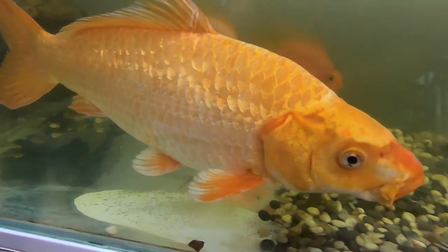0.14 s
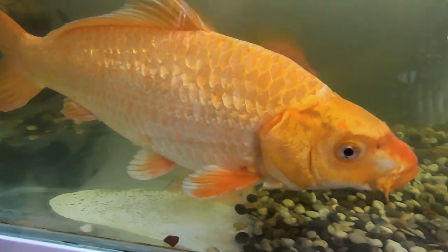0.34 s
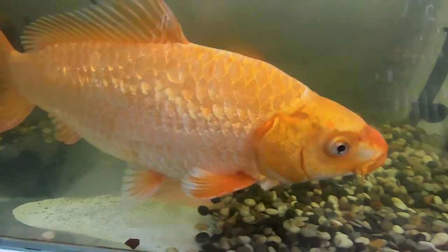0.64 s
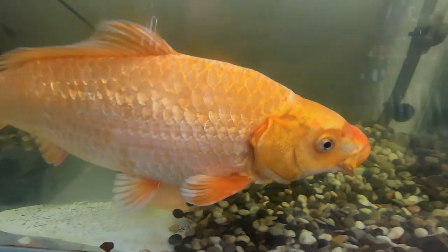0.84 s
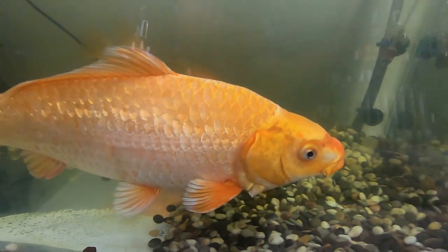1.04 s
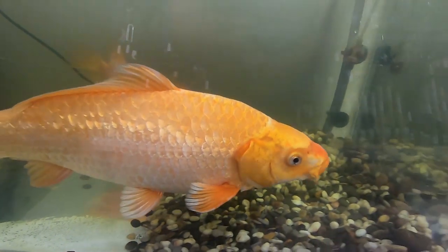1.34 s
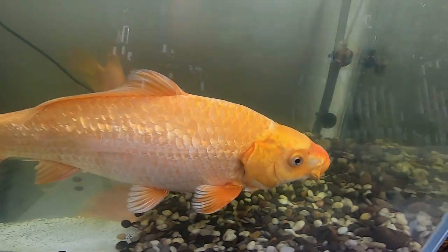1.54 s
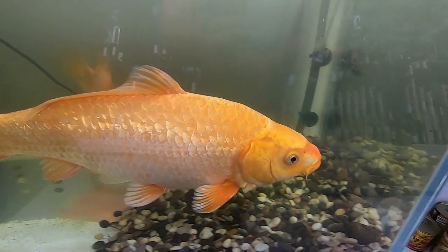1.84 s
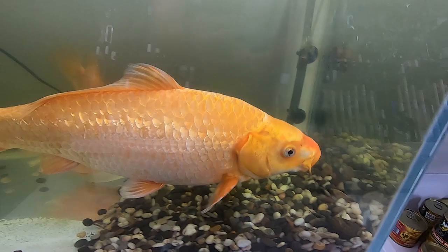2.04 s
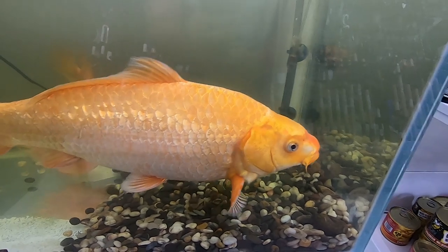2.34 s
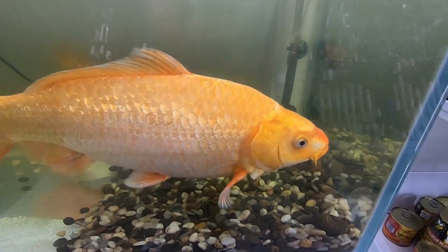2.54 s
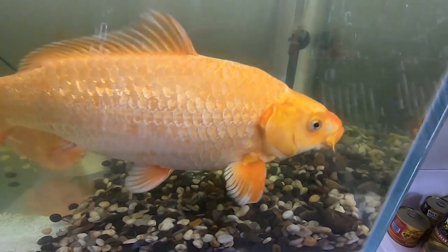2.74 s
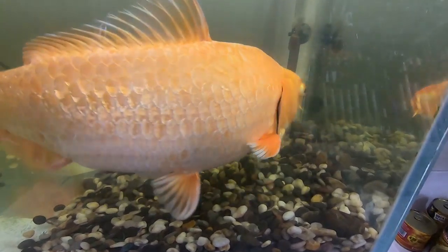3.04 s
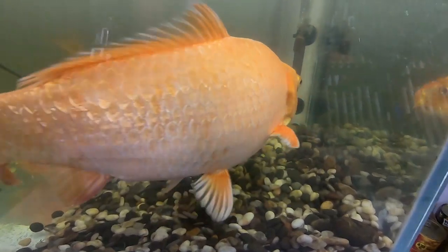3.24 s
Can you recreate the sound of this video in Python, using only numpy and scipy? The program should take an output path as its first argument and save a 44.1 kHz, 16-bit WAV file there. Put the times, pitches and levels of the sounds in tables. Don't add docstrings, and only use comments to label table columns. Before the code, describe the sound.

Aquarium air pump hums low and steady while water bubbles and air hisses faintly

```python
import sys
import numpy as np
from scipy import signal
from scipy.fft import rfft, irfft
from scipy.io import wavfile
from scipy.ndimage import uniform_filter1d

SR = 44100
rng = np.random.default_rng(int(sys.argv[2]) if len(sys.argv) > 2 else 0)


def magnitude_from_level(level_db):
    exponent = np.asarray(level_db, float) / 20
    return 10 ** exponent


def inscribe(sig):
    pcm = np.round(np.clip(np.atleast_2d(sig).T, -1, 1) * 32767)
    wavfile.write(sys.argv[1], SR, pcm.astype(np.int16))


N = 149940
STROKE_HZ = 50.03

# multiple of the stroke rate, level in dB, wobble in dB.
HARMONICS = [(2, -34, 0.33), (3, -49.5, 1), (4, -57.5, -1.5), (5, -60.5, 4.5)]
# time in seconds, change of hum in dB.
PUMP_LOAD = [(0, -2.2), (.8, -1), (1.7, -1.2), (2.6, -0.05), (3.4, 0)]
# frequency in Hz, density in dB per Hz.
RUMBLE_SPECTRUM = [(30, -52), (50, -27), (72, -6.5), (120, -6), (190, -3), (280, -11), (550, -18.5),
                   (1100, -22)]
# time in seconds, level in dB.
RUMBLE_LEVEL = [(0, -34), (.3, -41), (.7, -39.5), (.9, -38), (1.3, -42.5), (1.75, -45), (2.3, -46.5),
                (2.8, -45), (3.4, -45)]
# frequency in Hz, width in Hz, level in dB.
CASE_MODES = [(127, 3.4, -52.5), (150, 11, -60), (197.7, 40, -55.5), (298, 4.8, -62.5), (351.3, 8.6, -66),
              (368.6, 7.9, -66), (449, 18, -78), (644, 60, -67)]
# centre in seconds, frequency in Hz, level in dB, span in seconds.
CASE_THROBS = [(.03, 150, -39, .03), (.08, 183, -47, 0.055), (.14, 205, -40.5, 0.037),
               (.2, 152, -38, 0.077), (.31, 300, -53, 0.034), (.35, 144, -40, 0.026),
               (.43, 200, -39, 0.059), (.5, 146, -42, 0.032), (.57, 193, -44, 0.038),
               (.63, 140, -40, 0.046), (.7, 201, -39, 0.012), (.98, 148, -61, 0.036), (1.2, 151, -49, .04),
               (1.26, 190, -45, 0.05), (1.38, 152, -43.5, 0.053), (1.65, 151, -40, 0.062),
               (1.71, 194, -40, 0.015), (1.95, 150, -40, 0.059), (2.11, 258, -45, 0.033),
               (2.12, 152, -40, 0.053), (2.58, 203, -47, .03), (2.6, 149, -40.5, 0.022),
               (3.14, 190, -47.5, 0.036), (3.27, 199, -43.5, 0.025)]
# frequency in Hz, density in dB per Hz.
WASH_SPECTRUM = [(600, -4), (960, -4), (1250, 1.5), (2500, -1.5), (3200, -14), (4200, -14), (5200, -20.5),
                 (7500, -28.5)]
# time in seconds, level in dB, extra level of low bubbles in dB.
BUBBLING = [(0.0, -49.5, -4), (0.07, -46.5, 6.5), (0.98, -48.5, 10), (1.29, -44, -5), (1.36, -47, -11),
            (1.92, -47, -13), (1.95, -44.5, -32), (1.99, -47.5, -6), (2.51, -48, 1), (3.29, -45.5, 6.5),
            (3.4, -49, 11.5)]
# frequency in Hz, width in Hz, level in dB, busiest moment and span in seconds.
TANK_MODES = [(1278, 150, -6, 3.14, 0.15), (1465, 41, -10.5, 2.55, 0.52), (2120, 230, -10, 1.96, 0.034),
              (2650, 96, -2, 2.32, 0.017), (1850, 20, -22, 0.76, 0.48), (2112, 16, -14, 1.23, 0.63),
              (2420, 41, -22, 0.68, 1), (2260, 48, -10, 3.28, 0.33), (2385, 30, -9.5, .55, .1),
              (2404, 25, -10.5, 1.105, 0.068), (1550, 25, -11, 2.09, 0.12), (2520, 50, -15, 2.67, .1),
              (2350, 25, -13, 1.67, 0.089)]
# frequency in Hz, density in dB per Hz.
HISS_SPECTRUM = [(4500, -30), (7100, -6), (8900, 0), (9800, -6.5), (10750, -18), (11200, -36), (13400, -33),
                 (15000, -50)]
# time in seconds, level in dB.
HISS_LEVEL = [(0.0, -59), (1.92, -58), (2.52, -59.5), (2.65, -58), (3.2, -58), (3.4, -59.5)]
# time in seconds, depth of modulation from 0 to 1.
PUFF_DEPTH = [(0, .15), (.4, .27), (1.4, .22), (1.8, .12), (2.2, .2), (2.7, .1), (3.1, .25)]
# frequency in Hz, width in Hz, level in dB, busiest moment and span in seconds.
VALVE_WHISTLES = [(6800, 51, -20, 0.53, 0.7), (7990, 160, -8.5, 0.072, 0.79), (8450, 40, -25, 0.22, 0.27),
                  (8550, 50, -23, 1.1, .3), (9000, 95, -9.5, 0.54, 0.12), (8700, 57, -14, 0.96, .6),
                  (8100, 40, -10, 2.8, 0.2), (9050, 14, -18, 0.5, 0.11), (9600, 20, -18, 1.45, .03)]
# start in seconds, peak in dB, pitch in Hz.
LARGE_BUBBLES = [(0.047, -24, 1260), (0.176, -28, 1287), (.725, -38, 1850), (0.882, -35, 1176),
                 (0.93, -30, 1240), (1.06, -30, 1710), (1.396, -37, 1350), (1.492, -31, 2060),
                 (1.705, -31, 1680), (2.205, -29, 1550), (2.299, -35, 2540), (2.439, -42, 1540),
                 (2.479, -33, 1445), (2.644, -30, 1440), (2.682, -28.5, 1410), (2.721, -33, 1526),
                 (2.936, -30, 1360), (2.965, -31, 1214), (3.134, -27, 1300), (3.311, -30, 2156),
                 (0.809, -26.5, 2060), (1.144, -25, 1530), (1.201, -24.5, 2110), (1.602, -32.5, 2150),
                 (1.944, -26, 2130), (2.529, -28.5, 1398), (2.879, -33, 1750), (3.022, -24.5, 1233),
                 (3.082, -24, 1247), (3.232, -33, 1330), (3.268, -26, 1590), (3.361, -27, 2120)]
PARTIAL_RATIOS = np.array([[1], [.88], [1.14]])
PARTIAL_SHARES = np.array([[1.3], [.55], [.65]])
# time in seconds, pitch in Hz, level in dB.
LEAK_SQUEAKS = [
    [(.22, 10800, -83), (.3, 10200, -76), (.42, 9600, -75)],
    [(2.56, 9500, -72), (2.63, 9950, -72), (2.67, 10400, -71), (2.715, 10650, -75), (2.74, 11500, -78),
     (2.785, 12900, -79)],
    [(2.735, 9300, -67), (2.77, 9900, -65), (2.805, 9450, -67), (2.85, 9600, -72)],
    [(2.92, 9500, -71), (2.955, 10350, -73), (3.005, 9950, -73), (3.04, 10500, -74), (3.13, 10650, -77)],
    [(2.93, 12200, -86), (3.0, 12450, -81), (3.05, 12850, -82), (3.09, 12900, -83), (3.14, 13250, -83),
     (3.19, 12300, -81), (3.24, 12000, -83), (3.27, 11400, -82), (3.36, 9500, -74)],
    [(2.57, 12900, -89), (2.64, 13250, -88), (2.69, 13600, -85)],
    [(.22, 13200, -86), (.3, 13900, -87)],
    [(3.18, 10000, -76), (3.21, 9450, -67), (3.27, 9600, -68), (3.3, 9300, -72)],
]
# frequency in Hz, coherence from 0 to 1.
COHERENCE = [(40, .62), (100, .9), (170, .84), (300, .82), (600, .3), (1130, .28), (2360, .57), (4920, .55),
             (10200, .25)]
# frequency in Hz, phase in radians.
LEFT_LEAD = [(20, .12), (600, 0.), (1380, -.3), (4050, .1), (6800, -.6), (7300, -1.4), (8600, -3.9),
             (10400, -7.2)]
# frequency in Hz, level difference in dB.
LEFT_OVER_RIGHT = [(60, -1), (170, -1), (470, 0.3), (1310, .7), (3670, -1.6), (10200, -2.5)]


def evened(x):
    return x / np.sqrt(np.mean(x ** 2) + 1e-20)


def read(points, hz):
    f, value = np.transpose(points)
    return np.interp(np.log(hz + 1), np.log(f + 1), value)


def curve(rows, column=1):
    rows = np.array(rows)
    return np.interp(np.arange(N) / SR, rows[:, 0], rows[:, column])


def drift(rate_hz):
    t = np.arange(0, N, 64) / SR
    f = np.geomspace(.1 * rate_hz, rate_hz, num=16)
    phase = rng.random(16)
    slow = (np.sin(2 * np.pi * (f * t[:, None] + phase)) / np.sqrt(f)).sum(1)
    return np.interp(np.arange(N) / SR, t, evened(slow))


def colour(x, points):
    hz = np.fft.rfftfreq(N, 1 / SR)
    inside = (hz > points[0][0]) & (hz < points[-1][0])
    return evened(irfft(rfft(x) * magnitude_from_level(read(points, hz)) * inside, N))


def resonate(x, hz, width):
    r = np.exp(-np.pi * width / SR)
    return evened(signal.lfilter([1, 0, -1], [1, -2 * r * np.cos(2 * np.pi * hz / SR), r * r], x))


def rings(x, rows, wander_db):
    t = np.arange(N) / SR
    out = 0
    for hz, width, db, centre, span in rows:
        swell = np.exp(-((t - centre) / span) ** 2 / 2)
        out = out + magnitude_from_level(db + wander_db * drift(8)) * swell * resonate(x, hz, width)
    return out


def patchy(patchy_db, flicker_db, size=256):
    frames, bins = N * 4 // size + 5, size // 2 + 1
    draw = rng.standard_normal((frames, bins, 5)).T
    patches = evened(uniform_filter1d(uniform_filter1d(draw[4], size=5, axis=0), size=40, axis=1))
    flicker = evened(uniform_filter1d(uniform_filter1d(draw[4], size=40, axis=0), size=12, axis=1))
    z = (draw[:2] + 1j * draw[2:4]) * magnitude_from_level(patchy_db * patches + flicker_db * flicker)
    return evened(signal.istft(z, nperseg=size, noverlap=size * 3 // 4)[1][:, :N])


def hum():
    t = np.arange(N) / SR
    out = np.zeros(N)
    for k, db, wobble_db in HARMONICS:
        level = np.sqrt(2) * magnitude_from_level(db + wobble_db * drift(5.3))
        out += level * np.sin(2 * np.pi * (k * STROKE_HZ * t + rng.random()))
    return magnitude_from_level(curve(PUMP_LOAD)) * magnitude_from_level([[-.5], [.5]]) * out


def rumble():
    drive = patchy(0.69, 1.0, size=2048)
    case = sum(magnitude_from_level(db) * resonate(drive, hz, width) for hz, width, db in CASE_MODES)
    room = magnitude_from_level(-48) * colour(drive, RUMBLE_SPECTRUM)
    level = curve(RUMBLE_LEVEL)
    return magnitude_from_level(0.39 * (level - level.mean())) * (room + case)


def throbs():
    t = np.arange(N) / SR
    out = np.zeros(N)
    for centre, hz, db, span in CASE_THROBS:
        swell = np.exp(-((t - centre) / span) ** 2 / 2)
        out += magnitude_from_level(db) * swell * np.sin(2 * np.pi * (hz * t + rng.random()))
    return np.array([out, .2 * np.roll(out, 60)])


def bubble(hz, cycles, rise):
    u = np.arange(1500) / SR * hz / cycles
    return np.minimum(u * 8, 1) * np.exp(-3 * u) * np.sin(2 * np.pi * cycles * (u + rise * u ** 2 / 2))


def water():
    bubbles_per_s, bubble_db, bubble_cycles = 700, -6.5, 12
    size = magnitude_from_level(3.7 * np.minimum(rng.exponential(1, (2, N)), 5))
    starts = size * (rng.random((2, N)) < bubbles_per_s / SR)
    kind = rng.integers(0, 24, (2, N))
    low = magnitude_from_level(curve(BUBBLING, column=2))
    pops = np.zeros((2, N))
    for k, hz in enumerate(np.geomspace(1050, 2700, num=24)):
        hits = starts * (kind == k) * (low if hz < 1600 else 1)
        pops += signal.oaconvolve(hits, bubble(hz, bubble_cycles, 0.24)[None], axes=1)[:, :N]
    wash = colour(patchy(0.63, 1.0), WASH_SPECTRUM) + magnitude_from_level(bubble_db) * evened(pops)
    return magnitude_from_level(curve(BUBBLING) + 0.64) * evened(wash + rings(wash, TANK_MODES, 0.55))


def air():
    puff = 1 + curve(PUFF_DEPTH) * np.cos(2 * np.pi * STROKE_HZ * np.arange(N) / SR)
    drive = patchy(0.63, 0.77) * puff
    hiss = colour(drive, HISS_SPECTRUM)
    whistles = rings(resonate(drive, 8400, 3000), VALVE_WHISTLES, 2.5)
    return magnitude_from_level(curve(HISS_LEVEL) + .6) * evened(hiss + whistles)


def shop(x):
    wet_db, t60_s = -12, .25
    t = np.arange(8000) / SR
    tail = rng.standard_normal(8000) * magnitude_from_level(-60 * t / t60_s) * (t > .004)
    wet = signal.oaconvolve(x, tail[None] / np.linalg.norm(tail), axes=1)[:, :N]
    return (x + magnitude_from_level(wet_db) * wet) / np.sqrt(1 + magnitude_from_level(2 * wet_db))


def plops():
    level_db, t60_s, attack_s = -14.5, 0.062, 0.0034
    t, out = np.arange(N) / SR, np.zeros(N)
    for start, db, hz in LARGE_BUBBLES:
        u = np.clip(t - start, 0, 1)
        envelope = np.minimum(u / attack_s, 1) * magnitude_from_level(db + level_db - 60 * u / t60_s)
        phase = 2 * np.pi * hz * PARTIAL_RATIOS * u * (1 + 1.07 * u)
        out += envelope * (PARTIAL_SHARES * np.sin(phase)).sum(0)
    return out


def squeaks():
    t, out = np.arange(N) / SR, np.zeros(N)
    for rows in LEAK_SQUEAKS:
        on = np.clip(np.minimum(t - rows[0][0], rows[-1][0] - t) / 0.0094, 0, 1)
        hz = uniform_filter1d(curve(rows), size=600) * (1 + .004 * drift(80))
        level = np.sqrt(2) * magnitude_from_level(curve(rows, column=2) - 1.5 + 4 * drift(40))
        out += on * level * np.sin(2 * np.pi * np.cumsum(hz) / SR)
    return magnitude_from_level([[-1.5], [2.5]]) * out


def tick():
    start_s, db, t60_s = .774, -44.5, 0.0074
    u = np.clip(np.arange(N) / SR - start_s, 0, 1)
    modes = sum(share * np.sin(2 * np.pi * hz * u) for hz, share in ((6300, 1), (7600, 1.4), (5200, .8)))
    return magnitude_from_level(db - 60 * u / t60_s) * modes


def bump():
    centre_s, hz, db, width_s = 2.928, 140, -24, .006
    u = np.arange(N) / SR - centre_s
    return -magnitude_from_level(db) * np.exp(-(u / width_s) ** 2 / 2) * np.cos(2 * np.pi * hz * u)


def scene():
    tones = hum() + squeaks()
    knocks = plops() + tick() + bump()
    diffuse = rumble() + throbs() + shop(water() + air()) + np.array([knocks, 0.3 * knocks])
    a, b = rfft(diffuse)
    hz = np.fft.rfftfreq(N, 1 / SR)
    same = np.clip(read(COHERENCE, hz), 0, 1)
    half = np.exp(.5j * read(LEFT_LEAD, hz)) * magnitude_from_level(read(LEFT_OVER_RIGHT, hz) / 2)
    shared, unrelated = np.sqrt((1 + same) / 2), np.sqrt((1 - same) / 2)
    left = (shared * a + unrelated * b) * half
    right = (shared * a - unrelated * b) / half
    return tones + irfft(np.array([left, right]), N)


def band_limit(x):
    return signal.sosfilt(signal.butter(12, 14950, fs=SR, output="sos"), x)


def record(dry):
    return band_limit(dry)


dry = scene()
out = record(dry)
inscribe(out)
```